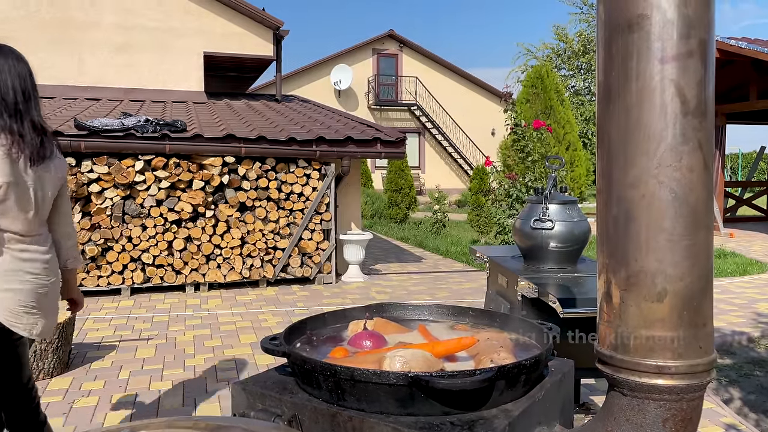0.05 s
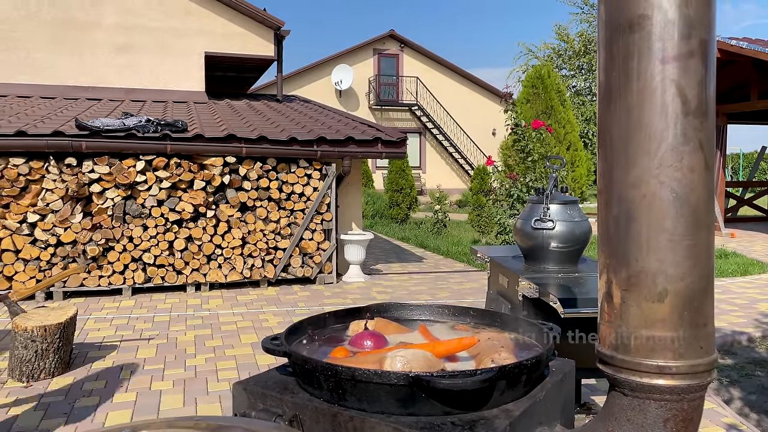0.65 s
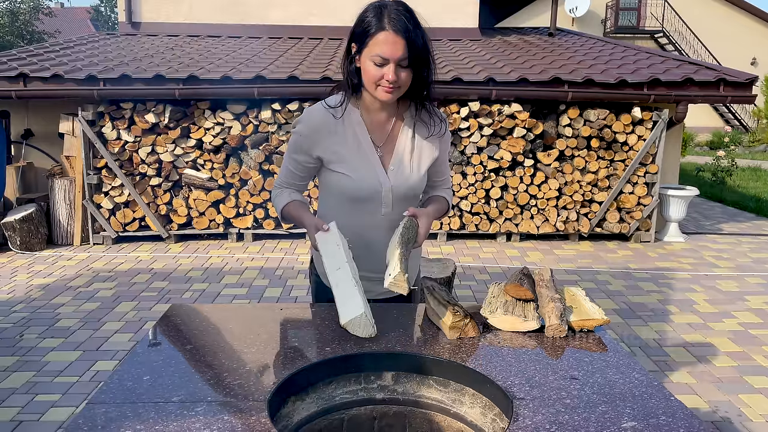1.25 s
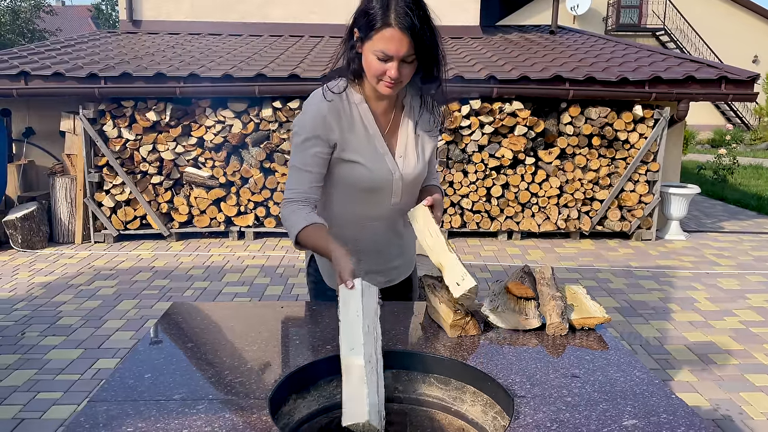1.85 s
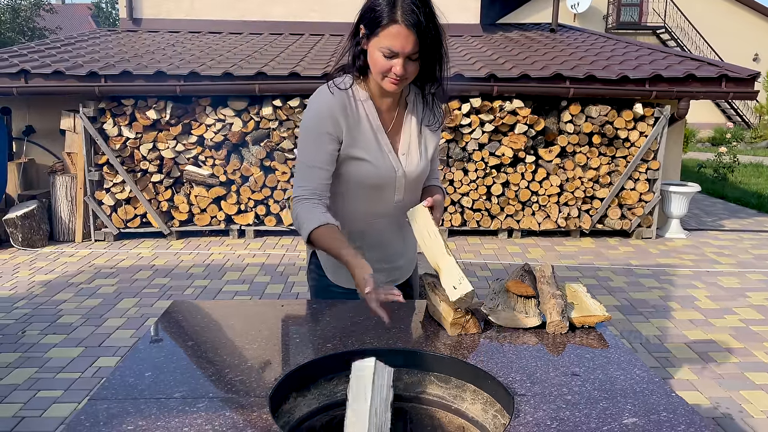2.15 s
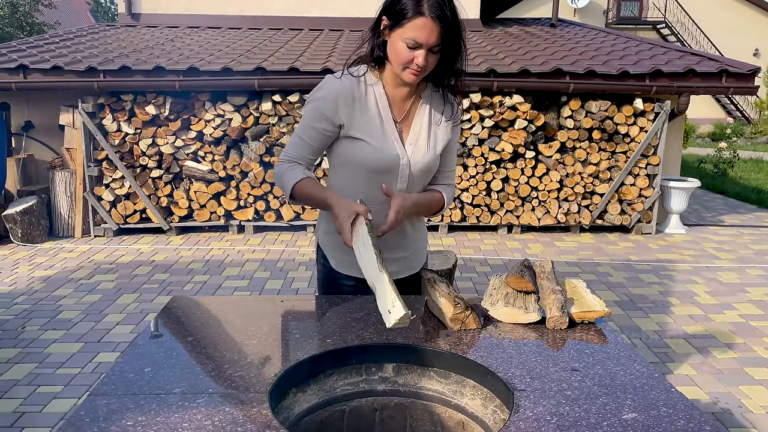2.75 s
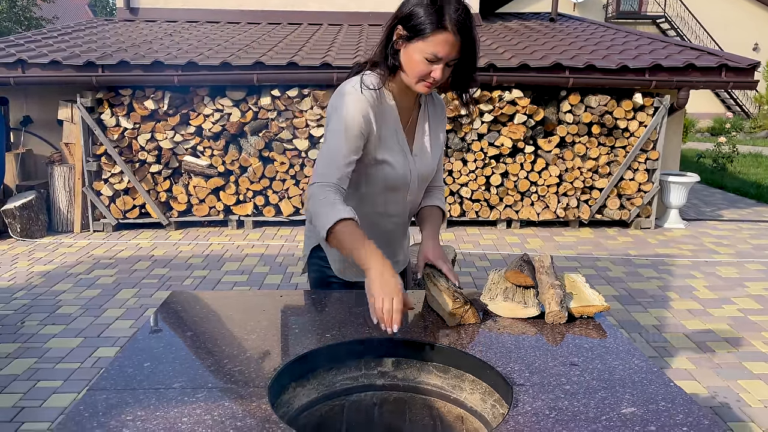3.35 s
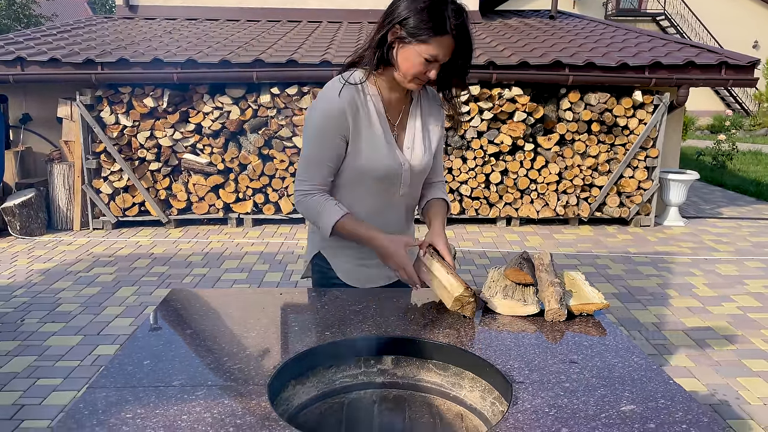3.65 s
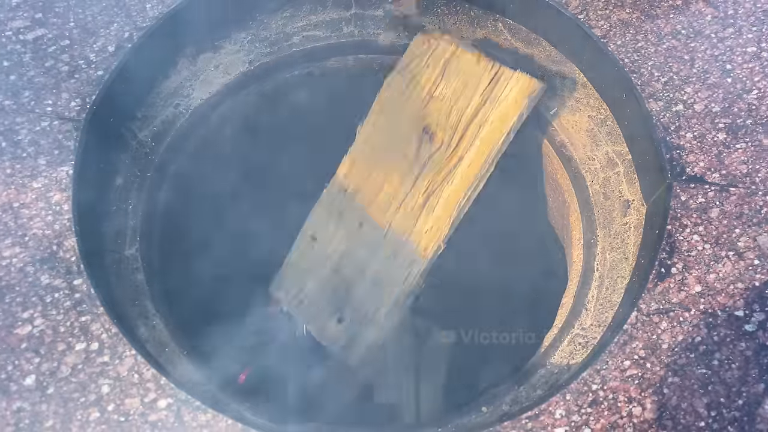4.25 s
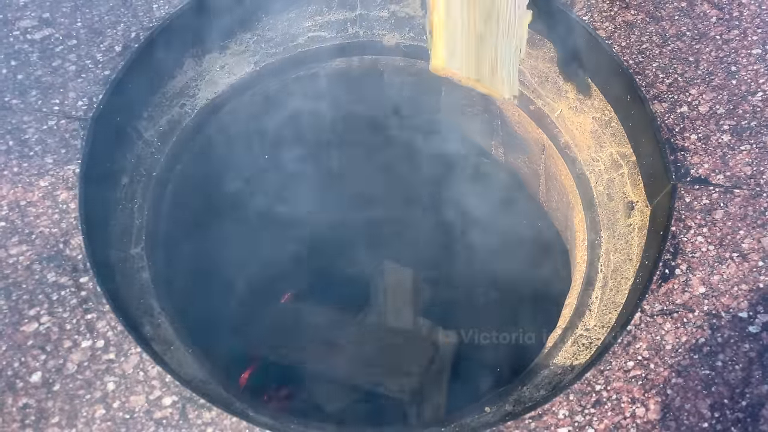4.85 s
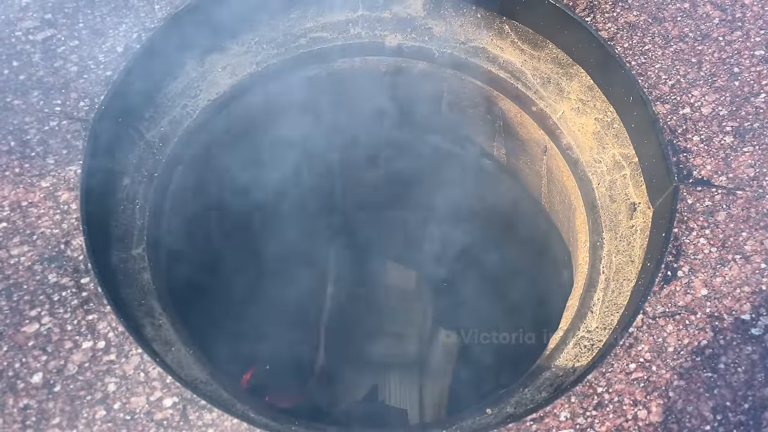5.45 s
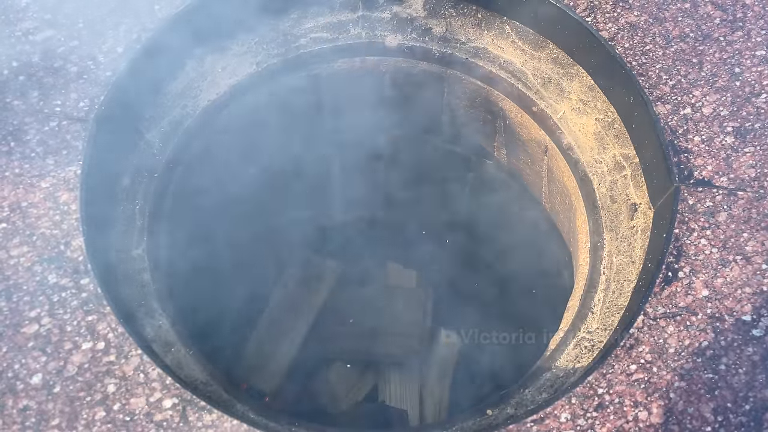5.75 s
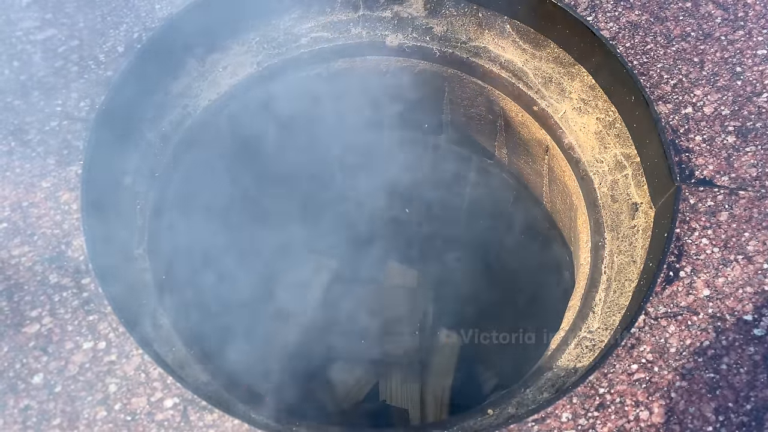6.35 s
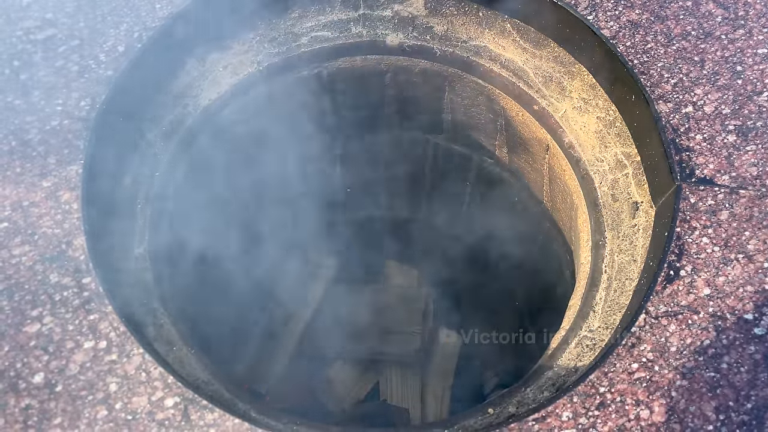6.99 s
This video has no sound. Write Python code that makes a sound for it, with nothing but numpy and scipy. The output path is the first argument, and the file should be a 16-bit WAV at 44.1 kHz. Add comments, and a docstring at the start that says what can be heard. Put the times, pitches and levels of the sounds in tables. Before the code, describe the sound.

In a quiet yard, shoes shuffle briefly and a small bird chirps faintly far off. Split logs knock and rock on a stone slab and swish through a hand. Then, heard from just above a stone oven pit, logs drop in twice, clattering against the wall and each other, scraping and landing with low, hollow thuds. Embers tick sparsely over a soft draught hum.

```python
"""In a quiet yard, split logs are picked off a stone slab, slide through the hand and drop into a
round stone oven pit. They knock on each other and on the wall, scrape along it and land with a thud
that sets the pit's air booming. Below, embers tick, steam whistles faintly out of damp wood and
the draught hums. Shoes shuffle on the paving and a small bird calls far off."""
import sys
import numpy as np
from scipy import signal
from scipy.fft import rfft, irfft, next_fast_len
from scipy.io import wavfile

SR = 44100
rng = np.random.default_rng(int(sys.argv[2]) if len(sys.argv) > 2 else 0)


def wav_record(signal):
    """Record a signal, one row per channel, as 16-bit PCM in the file named by sys.argv[1]."""
    frames = np.transpose(np.atleast_2d(signal))
    bounded = np.clip(frames, -1, 1)
    # unit amplitude maps onto the largest positive 16-bit level
    quanta = np.round(bounded * 32767).astype(np.int16)
    wavfile.write(sys.argv[1], SR, quanta)


N = 309582
TIME = np.arange(N) / SR
HIT_TIME = TIME[:SR // 2]   # half a second, the room given to one short sound
SHAFT_HZ = 105.2   # lowest note of the air in the pit's shaft
OVER_PIT_S = 3.5   # from here on we listen from above the pit

# The tone of rubbed wood. Each row: frequency in Hz, level in dB.
RUB_SPECTRUM = [(100, -21), (220, -6), (360, -5.5), (560, -2.5), (1000, -6), (2000, -3), (2800, -4),
                (4300, -2.5), (6000, -3.5), (8000, -8.5), (11000, -19.5), (15000, -33)]
# Logs and shaft ringing together. Each row: pitch in Hz, level in dB, ring time in seconds.
# A ring time (t60) is how long a sound takes to fall by 60 dB.
PIT_RINGS = [(795, -2.5, .13), (1395, -2, .05), (1850, -1.5, .05), (1905, 0, .05), (2420, -7, .04),
             (2640, -6, .04), (3520, -5, .05), (3980, -3, .04), (5050, -3, .03)]


def from_db(db):
    """Turn decibels into a gain."""
    return 10 ** (np.asarray(db) / 20)

def rms_one(x):
    """Scale a sound to an average power of 1."""
    return x / np.sqrt(np.mean(x ** 2) + 1e-20)

def unit_hit(x):
    """Scale a hit to an average power of 1 over its first 20 ms."""
    return x / np.sqrt(np.mean(x[:SR // 50] ** 2) + 1e-20)

def at_hz(points, hz, column=1):
    """Read a table at any frequency, blending between its rows."""
    points = np.array(points)
    return np.interp(np.log(hz), np.log(points[:, 0]), points[:, column])

def band(x, low_hz, high_hz, order=2):
    """Keep the sound between two frequencies."""
    sos = signal.butter(order, [low_hz, min(high_hz, .45 * SR)], "band", fs=SR, output="sos")
    return signal.sosfilt(sos, x + 1e-18)

def fade(t, t60):
    """A gain that falls 60 dB in t60 seconds."""
    return np.exp(-np.log(1000) * t / max(t60, 1e-4))

def onward(s, rise_s=0.036):
    """A gain that rises from 0 to 1, starting at time s."""
    return np.clip((TIME - s) / rise_s, 0, 1)

def drift(rate):
    """A curve that wanders to a new random value `rate` times a second."""
    knots = rng.standard_normal(N // 20)
    return np.interp(TIME * rate, np.arange(len(knots)), knots)

def resonate(x, hz, width_hz):
    """Make a sound ring at one pitch; a narrower width rings longer."""
    r = np.exp(-np.pi * width_hz / SR)
    feedback = [1, -2 * r * np.cos(2 * np.pi * hz / SR), r * r]
    return signal.lfilter(np.array([1, 0, -1]) * (1 - r * r) / 2, feedback, x)

def coloured(x, spectrum):
    """Give noise the tone in a table, at a power of 1."""
    size = next_fast_len(N)
    hz = np.maximum(np.fft.rfftfreq(size, 1 / SR), 1)
    return rms_one(irfft(rfft(x, size) * from_db(at_hz(spectrum, hz)), size)[:N])

def grains(spread_db):
    """Noise made of tiny contacts of very uneven strength."""
    return rms_one(rng.standard_normal(N) * from_db(spread_db * np.clip(rng.standard_normal(N), -2, 2)))

def strokes(rows):
    """The gain of rubbing strokes: each bites quickly and lets go slowly."""
    return sum(from_db(db) * np.sin(np.pi * np.clip((TIME - s) / length, 0, 1) ** 0.58)
               for s, length, db in rows)

def add(out, s, sound):
    """Mix a sound in at time s."""
    start = int(s * SR)
    out[start:start + len(sound)] += sound[:N - start]

def yard_air():
    """Soft outdoor air with a narrow, distant hiss."""
    # The tone of the air. Each row: frequency in Hz, level in dB.
    air_spectrum = [(20, -22.5), (35, -8.5), (200, -6), (290, -7), (350, -1.5), (480, -9), (900, -13.5),
                    (2500, -21.5), (4600, -20), (6200, -25.5), (11000, -27), (16000, -35)]
    air = from_db(-71) * coloured(rng.standard_normal(N), air_spectrum)
    hiss = from_db(-82.5) * rms_one(band(rng.standard_normal(N), 4350, 4950))
    return air + hiss

def draught(far_db=-77.5, beside_db=-71, above_db=-64, beside_pit_s=0.87):
    """The draught hums unsteadily in the shaft, louder the nearer we are."""
    hum = rms_one(resonate(resonate(rng.standard_normal(N), SHAFT_HZ, 21), SHAFT_HZ, 83))
    db = far_db + (beside_db - far_db) * onward(beside_pit_s)
    db += (above_db - beside_db) * onward(OVER_PIT_S)
    return from_db(db + 5.5 * drift(7.1)) * hum

def far_tone(ends_s=0.88):
    """A faint, unsteady tone from beyond the yard."""
    tone = rms_one(band(rng.standard_normal(N), 920, 960))
    return from_db(-87) * (1 - onward(ends_s)) * tone

def shoes():
    """Shoes shuffle dully on the paving."""
    # Each row: start in seconds, length in seconds, level in dB.
    shuffles = [(.26, 0.05, -64), (.358, 0.056, -57)]
    return strokes(shuffles) * rms_one(band(rng.standard_normal(N), 235, 550, order=1))

def bird(length_s=0.055, from_hz=3800, to_hz=2500):
    """A small bird far off repeats one short, falling note."""
    # Each row: start in seconds, level in dB.
    chirps = [(.66, -78), (.985, -77), (1.56, -72)]
    out, progress = np.zeros(N), np.clip(HIT_TIME / length_s, 0, 1)
    hz = from_hz + (to_hz - from_hz) * progress
    note = np.sin(np.pi * progress) * np.sin(2 * np.pi * np.cumsum(hz) / SR)
    for s, db in chirps:
        add(out, s, from_db(db) * note)
    return out

def sliding(edge_drop_db=18.5, floor_echo_s=.0098):
    """Dry fibres swish through the hand, set the log ringing and echo off the pit floor."""
    # Each row: fastest moment of a slide in seconds, half its length in seconds, top level in dB.
    slides = [(0.906, 0.16, -68.5), (1.296, 0.4, -72), (1.78, 0.16, -60), (1.957, 0.3, -51),
              (2.37, 0.17, -57.5), (2.661, 0.26, -56.5), (3.564, 0.092, -66.5), (6.636, 0.23, -68)]
    # The sliding log's notes. Each row: pitch in Hz, width in Hz, gain in dB.
    log_notes = [(348, 43, 6), (2770, 420, -10.5), (6270, 110, -6)]
    power = 0
    for s, half_s, db in slides:
        from_middle = np.minimum(np.abs(TIME - s) / half_s, 10)
        power += from_db(db - edge_drop_db * from_middle ** 1.82) ** 2
    fibres = coloured(grains(spread_db=4), RUB_SPECTRUM)
    rub = fibres + sum(from_db(db) * resonate(fibres, hz, width) for hz, width, db in log_notes)
    echo = .45 * np.roll(rub, int(floor_echo_s * SR))
    flicker = from_db(drift(40.18))
    return np.sqrt(power) * flicker * rms_one(rub - echo)

def scuffing():
    """A log gives a short, gritty rub on bark or stone."""
    # Each row: start in seconds, length in seconds, level in dB.
    scuffs = [(1.069, 0.034, -59.5), (2.471, 0.023, -49.5), (2.56, 0.099, -54.5), (3.61, 0.094, -61.5)]
    return strokes(scuffs) * coloured(grains(spread_db=7), RUB_SPECTRUM)

def clatter(table, crack, crack_s, echo_db, echo_t60):
    """A crack at contact, the dense ring of the wood, then a weak echo that is longer in the bass."""
    out, t = 0, HIT_TIME
    edges_hz = 75 * 2 ** np.arange(0, 8.1, .5)   # half an octave apart
    for low, high in zip(edges_hz, edges_hz[1:]):
        hz = np.sqrt(low * high)
        echo = from_db(echo_db) * fade(t, echo_t60 * (1000 / hz) ** 0.15)
        shape = crack * np.exp(-t / crack_s) + fade(t, at_hz(table, hz, column=2)) + echo
        part = band(rng.standard_normal(len(t)) * shape, low, high)
        out += rms_one(part) * from_db(at_hz(table, hz)) * np.sqrt(high - low)
    return unit_hit(out)

def ringing(notes, detune, uneven_db=2.5):
    """Logs differ in size, and each blow meets another spot, so the notes ring with new strengths."""
    out, size = 0, 1 + detune * rng.standard_normal()
    for (hz, db, t60), (strength, sign) in zip(notes, rng.standard_normal((len(notes), 2))):
        gain = np.sign(sign) * from_db(db + uneven_db * strength)
        out += gain * np.sin(2 * np.pi * hz / size * HIT_TIME) * fade(HIT_TIME, t60)
    return unit_hit(out)

def log_ring(s):
    """The log being handled at time s rings with its own notes."""
    # Four logs. Each row: pitch in Hz, level in dB, ring time in seconds.
    first_log = [(353.4, 2.5, 0.059), (608, 0.5, 0.046), (731, 0.5, 0.03), (895, -9.5, 0.078),
                 (1056, -8, 0.073), (1444, -4, 0.066), (1728, -7.5, 0.037)]
    thin_log = [(620, -2, .07), (865, -4, .11), (1055, -9, .15), (1540, -1, .05), (1640, 2, .06),
                (3430, -10, .07)]
    broad_log = [(345, 1, .08), (468, 0, .09), (860, 1, .06), (1066, -3, .11)]
    last_log = [(330, 1, .055), (460, 1, .055), (610, -2, .06), (830, -3, .06), (1460, 0, .05)]
    # Each row: in hand from this second, level above the clatter in dB, the log's notes.
    turns = [(0, 2, first_log), (3.5, 6, thin_log), (4.4, 0, broad_log), (5.3, 0, last_log)]
    _, db, notes = [turn for turn in turns if turn[0] <= s][-1]
    return from_db(db) * ringing(notes, detune=.012)

def knock(body, levels_db, contact_s=0.00049):
    """Shape one blow: blunt contacts feed the bass, hard edges the treble."""
    bass, middle, treble = from_db(levels_db)
    body = body * (1 - np.exp(-HIT_TIME / contact_s))   # the bark gives way before the blow peaks
    return (bass * unit_hit(band(body, 80, 700, order=3))
            + middle * unit_hit(band(body, 700, 2500, order=4))
            + treble * unit_hit(band(body, 2500, 18000, order=4)))

def yard_knocks():
    """Logs knock and rock on the slab or land in the pit, heard from beside it; the yard walls answer."""
    # Each row: start in seconds, then bass, middle and treble levels in dB.
    hits = [(1.0978, -57, -61, -58.5), (1.2992, -50, -64, -73), (1.4388, -47.5, -52.5, -46.5),
            (2.476, -51.5, -62, -46.5), (2.5437, -43.5, -73, -48.5), (2.562, -74, -51, -50.5),
            (2.6, -74, -71, -49.5), (2.68, -63, -61.5, -60), (3.186, -68.5, -73.5, -85),
            (3.606, -45.5, -44.5, -52), (3.618, -82, -50, -48)]
    # The dense ring of split wood. Each row: frequency in Hz, level in dB, ring time in seconds.
    wood = [(95, 1, 0.55), (255, -6.5, 0.12), (365, -4.5, 0.39), (790, -11, 0.37), (1490, -9, 0.042),
            (2000, -29.5, 0.11), (5080, -16.5, 0.031), (7900, -28, 0.041), (15000, -47, 0.025)]
    out = np.zeros(N)
    for s, *levels_db in rocking() + hits:
        body = clatter(wood, crack=1.47, crack_s=0.0079, echo_db=-24, echo_t60=1.0)
        add(out, s, knock(body + log_ring(s), levels_db))
    return out

def rocking(start_s=1.1273, first_gap_s=.0766, gap_share=.58):
    """List the knocks of a log rocking to rest: each comes sooner, softer and duller."""
    # Bass, middle and treble in dB: the first knock, and what each next one loses.
    first_db = (-38, -40.5, -59)
    loss_db = (5, 8, 10.4)
    s, rows = start_s, []
    for k in range(4):
        levels_db = np.array(first_db) - k * np.array(loss_db)
        rows.append((s, *levels_db))
        s += first_gap_s * gap_share ** k
    return rows

def judder(hz=394):
    """The log judders at the fastest point of a slide."""
    # Each row: start in seconds, length in seconds, level in dB.
    judders = [(1.922, 0.092, -58)]
    return strokes(judders) * rms_one(band(rng.standard_normal(N), hz - 50, hz + 50))

def embers():
    """Embers and splinters snap; larger, lower pieces ring longer, and the shaft adds a short tail."""
    # Each row: start in seconds, peak level in dB, pitch in Hz.
    ticks = [(3.2995, -45, 2200), (3.7631, -37, 6150), (3.833, -44, 4270), (3.9774, -47.5, 9200),
             (4.261, -44.5, 5000), (4.3008, -40, 4600), (4.361, -49, 6700), (4.776, -41, 4500),
             (5.0926, -40.5, 6500), (5.121, -45, 5040), (5.1818, -41, 6460), (5.196, -40, 7300),
             (5.8469, -33, 5860), (6.022, -47.5, 6990), (6.1818, -48, 9020), (6.808, -37.5, 5300),
             (6.9288, -40, 5340), (6.966, -45, 5580), (7.0153, -41.5, 6470)]
    out, t = np.zeros(N), HIT_TIME
    for s, db, hz in ticks:
        burst = rng.standard_normal(len(t)) * (fade(t, 0.008) + from_db(-12.5) * fade(t, 0.067))
        snap = band(resonate(burst, hz, hz * hz / 12000), 500, 11000)
        add(out, s, from_db(db) * snap / np.abs(snap).max())
    return out

def thuds():
    """A log landing on the ash pushes the air of the shaft, which swings at its lowest notes."""
    # Each row: start in seconds, level in dB.
    landings = [(3.655, -45), (4.517, -32.5), (4.583, -46), (4.764, -43.5), (4.887, -36), (5.357, -38.5),
                (5.669, -32.5), (5.686, -26.5), (5.755, -29.5), (5.926, -35), (6.007, -44)]
    out, t = np.zeros(N), HIT_TIME
    swing = np.sin(2 * np.pi * SHAFT_HZ * t) * fade(t, 0.23)
    swing += from_db(-8.5) * np.sin(2 * np.pi * 135 * t) * fade(t, 0.17)
    soft_start = 1 - np.exp(-t / 0.0034)
    for s, db in landings:
        rumble = from_db(-18) * unit_hit(band(rng.standard_normal(len(t)), 140, 300) * fade(t, 0.37))
        add(out, s, from_db(db) * (swing + rumble) * soft_start)
    return band(out, 75, 2000, order=3)

def whistle(levels_db=(-80, -84), fade_s=.04):
    """A thin, rough jet of steam escapes from damp wood in two wavering spells."""
    # One pitch curve for each spell. Each row: time in seconds, pitch in Hz.
    spells = [
        [(3.78, 10000), (3.84, 9550), (3.94, 10150), (4.03, 9700), (4.11, 10500), (4.22, 9800), (4.335, 10900),
         (4.37, 9700), (4.51, 11300)],
        [(5.95, 10150), (7.0, 9950)],
    ]
    waver_hz = 130 * drift(80) + 170 * drift(900)
    flutter_db = 5.5 * drift(45)
    out = 0
    for curve, db in zip(spells, levels_db):
        s, hz = np.transpose(curve)
        gate = onward(s[0], fade_s) - onward(s[-1], fade_s)
        tone = np.sin(2 * np.pi * np.cumsum(np.interp(TIME, s, hz) + waver_hz) / SR)
        out += gate * from_db(db + flutter_db) * tone
    return out

def pit_knocks():
    """Logs hit the wall and the logs below; each has its own ring, and the shaft rings along. The faint first
    row is no log: it gives body to an ember's snap."""
    # Each row: start in seconds, then bass, middle and treble levels in dB.
    hits = [(3.8296, -70, -71, -84), (4.5134, -36, -48, -51.5), (4.535, -40.5, -48, -50),
            (4.5478, -40.5, -41.5, -38.5), (4.571, -32, -34.5, -28.5), (4.584, -40.5, -35, -43.5),
            (4.6706, -47.5, -61, -64), (4.726, -40, -58, -63), (4.9624, -58.5, -67, -61.5),
            (5.0205, -54, -72, -64), (5.3902, -27, -26, -40), (5.398, -41, -66, -32),
            (5.4283, -29, -28.5, -25.5), (5.5691, -49, -55.5, -76), (5.6065, -60, -45, -29),
            (5.6637, -43, -55.5, -42.5), (5.686, -49, -52.5, -54), (5.751, -43, -57.5, -49.5),
            (5.899, -63, -62.5, -59.5), (5.9203, -58, -66.5, -66)]
    # The dense ring of wood in the pit. Each row: frequency in Hz, level in dB, ring time in seconds.
    wood = [(105, -6.5, 0.11), (244, -12, 0.077), (332, -2, 0.079), (820, -14.5, 0.086), (1538, -7.5, 0.05),
            (2080, -20.5, 0.092), (5000, -15, 0.043), (8900, -24.5, 0.038), (10340, -37, 0.049),
            (15000, -47.5, .05)]
    out = np.zeros(N)
    for s, *levels_db in hits:
        body = clatter(wood, crack=0.77, crack_s=0.0071, echo_db=-31, echo_t60=0.48)
        shaft = from_db(-3) * ringing(PIT_RINGS, detune=.007)
        add(out, s, knock(body + log_ring(s) + shaft, levels_db))
    return out

def scraping():
    """Splinters catch on the stone and grit trickles; each ring swells and fades as the contact moves."""
    # A log grazes the wall. Each row: start in seconds, length in seconds, relative level in dB.
    grazes = [(4.268, 0.06, -56.5), (4.515, 0.035, -45.5), (4.605, 0.057, -52.5), (4.717, 0.041, -42),
              (4.762, 0.076, -52), (4.826, 0.039, -50.5), (4.864, 0.059, -52), (5.022, 0.036, -55),
              (5.085, 0.077, -60.5), (5.175, 0.069, -56), (5.245, 0.073, -55.5), (5.555, 0.006, -45.5),
              (5.708, 0.046, -54)]
    # The tone of grit. Each row: frequency in Hz, level in dB.
    grit_spectrum = [(200, -10), (500, -10), (790, -6), (1000, -10), (1850, -8), (2600, -2.5), (4200, -5),
                     (7200, -2), (10500, -10.5), (15000, -18.5)]
    level = np.hypot(grit_level(), strokes(grazes))
    rub = level * catches() * coloured(grains(spread_db=3.5), grit_spectrum)
    ring = sum(from_db(db + 6 * np.tanh(drift(25))) * resonate(rub, hz, 5 / t60)
               for hz, db, t60 in PIT_RINGS)
    return from_db(-3.5) * shaft_echo(rub + 1.1 * ring, t60=.05, wet_db=-5)

def grit_level(unstirred_db=-91.5, stirred_db=-74.5, settle_db_per_s=26.5):
    """The gain of the grit: logs stir it up, then it settles to the fine crackle of the embers."""
    # Each row: strongest moment in seconds, seconds to rise by 10 dB, relative level in dB.
    stirs = [(4.69, 0.074, -64.5), (5.38, .3, -60)]
    power = (from_db(unstirred_db) * onward(OVER_PIT_S)) ** 2
    power += (from_db(stirred_db) * onward(stirs[0][0])) ** 2
    for s, rise_s, db in stirs:
        drop_db = np.maximum(10 * (s - TIME) / rise_s, settle_db_per_s * (TIME - s))
        power += from_db(db - drop_db) ** 2
    return np.sqrt(power)

def catches(per_s=520, catch_s=.0016, spread_db=5, drag=.45):
    """Stick and slip: sudden catches of uneven strength die at once, over a weak steady drag."""
    slips = (rng.random(N) < per_s / SR) * from_db(spread_db * np.clip(rng.standard_normal(N), -2, 2))
    pulses = signal.lfilter([1], [1, -np.exp(-1 / (catch_s * SR))], slips + 1e-18)
    return rms_one(drag + pulses)

def shaft_echo(x, t60, wet_db):
    """Sound bounces round the stone wall and leaves a short, dense echo."""
    response = rng.standard_normal(len(HIT_TIME)) * fade(HIT_TIME, t60)
    return x + from_db(wet_db) * signal.fftconvolve(x, response / np.linalg.norm(response))[:N]

def scene():
    """Add the logs, the fire and the yard together in one channel."""
    logs = yard_knocks() + pit_knocks() + thuds() + scraping() + sliding() + judder() + scuffing()
    return (logs + shoes() + embers() + whistle() + bird() + far_tone() + yard_air() + draught())[None]

def record(dry, cutoff_hz=15900):
    """Cut off the highest treble steeply."""
    return signal.sosfilt(signal.ellip(10, .1, 70, cutoff_hz, fs=SR, output="sos"), dry)


dry = scene()
out = record(dry)
wav_record(out)
```